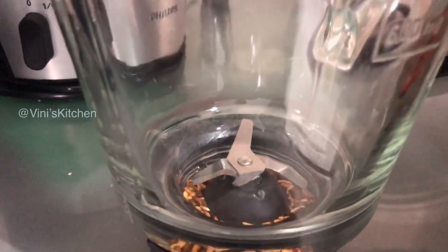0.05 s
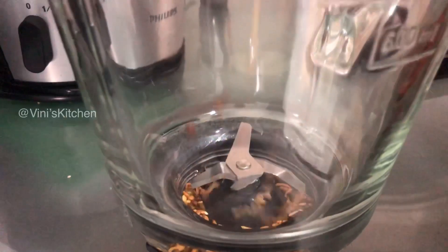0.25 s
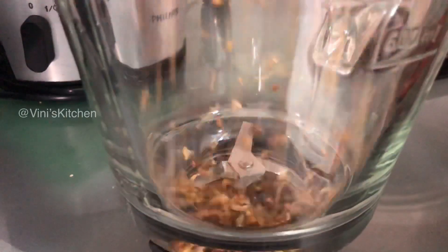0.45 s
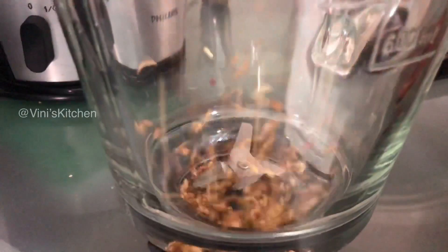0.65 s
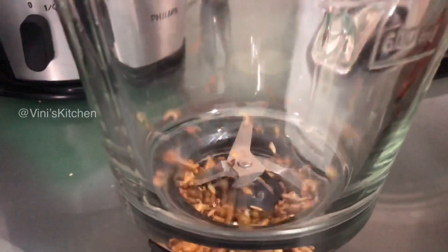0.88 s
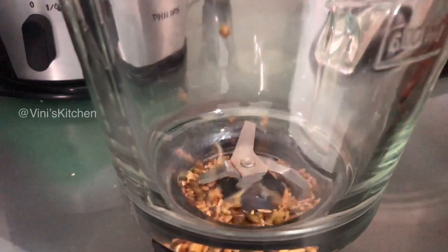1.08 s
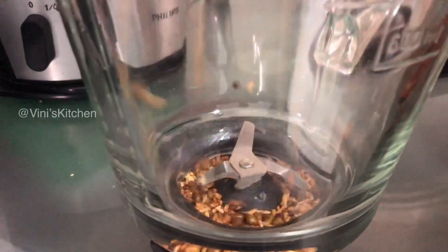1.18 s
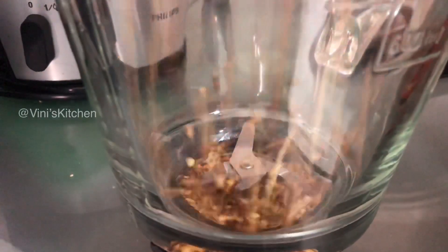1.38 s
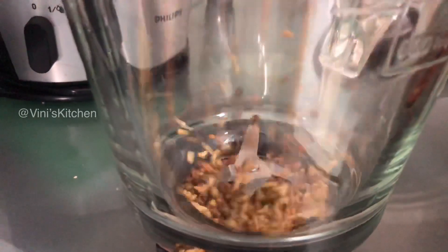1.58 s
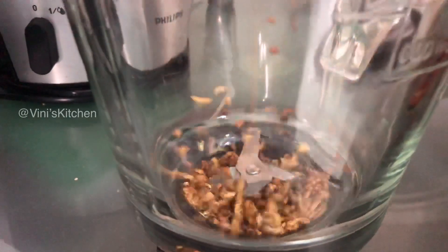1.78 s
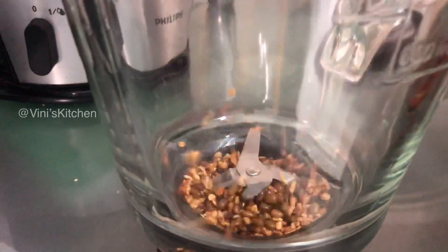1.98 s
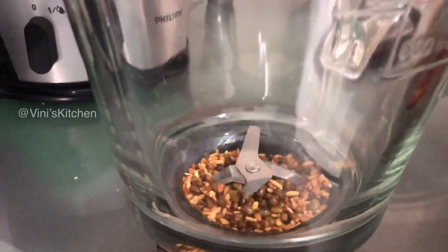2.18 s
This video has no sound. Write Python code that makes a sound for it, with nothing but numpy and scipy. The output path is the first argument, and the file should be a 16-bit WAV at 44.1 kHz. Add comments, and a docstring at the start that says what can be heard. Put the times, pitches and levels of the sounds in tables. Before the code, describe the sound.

Dry grains rattle into a glass blender jar, close up. A soft sliding rustle and a few clicks lead to a dense pour at about 0.3 seconds, with a brief high ring of glass. It thins by 0.9, the rustle returns, and a second batch clatters in from 1.3. Single knocks and seed pings stand out, dwindling by 2.2 seconds over faint kitchen hum.

```python
"""A small kitchen, one microphone close to a glass blender jar on the counter.
Dry grains are poured in two batches, each led in by the soft rustle of sliding grains.
A dense stream rattles on the glass and the heap, heavier pieces knock singly, hard seeds ping,
and once the glass gives a longer high ring. Each contact clicks; those on bare glass ring the jar.
Further off: dull room noise and low hums."""
import sys
import numpy as np
from scipy import signal
from scipy.fft import rfft, irfft, next_fast_len
from scipy.io import wavfile
from scipy.ndimage import map_coordinates

SR = 44100
rng = np.random.default_rng(int(sys.argv[2]) if len(sys.argv) > 2 else 0)


def file_out(sig):
    """Save sig as 16-bit WAV at sys.argv[1]."""
    # one column per channel
    cols = np.atleast_2d(sig).T
    # limit, then scale
    lim = np.clip(cols, -1, 1)
    pcm = np.round(lim * 32767).astype(np.int16)
    wavfile.write(sys.argv[1], SR, pcm)


N = 99225

# colour of the room noise: pitch_hz, gain_db
AIR_COLOUR = [(20, -50), (33, -27), (48, -11.5), (80, -12), (135, -6.5), (200, -13.5), (320, -7.5),
              (460, -15), (600, -9.5), (900, -25), (2000, -35.5), (6000, -39)]
# low hums in the room: pitch_hz, level_db, start_s, end_s
ROOM_HUMS = [(48.6, -56.5, -.2, 1.27), (101, -60, .25, 1.5), (307, -64, -.2, 2.5), (64.6, -51, 1.87, 2.5)]
# grains sliding in the vessel above the jar: start_s, end_s, level_db
GRAIN_SLIDES = [(-.1, .3, -49), (0.96, 1.332, -45)]
# colour of the sliding: pitch_hz, gain_db
RUSTLE_COLOUR = [(300, -11), (800, -0.5), (1400, -1.5), (2300, -2), (4500, 3), (8000, -1), (12000, -6),
                 (16000, -21)]
# the stream's relative level in three bands: time_s, low_db, clatter_db, treble_db
STREAM_LEVELS = [(0.0, -73, -64.5, -62), (0.14, -70, -48, -57), (0.188, -58, -38.5, -43.4),
                 (0.285, -73, -38.8, -44.5), (0.342, -32, -32, -32), (0.409, -32.5, -26, -31.5),
                 (0.492, -35.5, -30, -31.5), (0.58, -33, -30, -35.5), (0.66, -33.5, -31, -32),
                 (0.75, -41, -33, -36.9), (0.83, -42.1, -36.5, -37.5), (0.9, -40, -38.5, -43.5),
                 (0.98, -44.5, -40.5, -43), (1.07, -46.5, -37, -40.5), (1.13, -52, -40, -46.5),
                 (1.23, -52, -40, -46.5), (1.291, -52, -35, -36), (1.349, -32.5, -26, -31.5),
                 (1.439, -36.5, -30, -32.5), (1.57, -34, -29, -31.5), (1.633, -46.4, -36, -38.5),
                 (1.692, -38.5, -33.5, -33.5), (1.78, -38.5, -33, -36.5), (1.83, -47.5, -39, -44.5),
                 (1.95, -46, -40, -41.5), (1.99, -52, -44.5, -49), (2.11, -45, -44.5, -49),
                 (2.17, -81, -59, -64.3), (2.25, -80, -57, -65)]
# colour of a click inside the jar: pitch_hz, gain_db
CLICK_COLOUR = [(100, -29), (400, -21.5), (750, -8), (1100, -3.5), (1450, -10), (1680, -20.5),
                (2200, -26.5), (2800, -19.5), (3300, -9.5), (4100, -12), (4550, -6.5), (5150, -3),
                (5800, -8), (6300, -2), (6950, 0.5), (7700, -10.5), (8400, -15.5), (9600, -6), (11100, -10),
                (11900, -8), (13000, -9), (13700, -18), (16000, -10)]
# modes of the glass jar: pitch_hz, relative_energy_db, t60_s
JAR_MODES = [(832, -18.5, .11), (1378, -11, .17), (2314, -31, .2), (3000, -17, .25), (3168, -17, .09),
             (4420, -23, .04), (6350, -19, .08), (6500, -20, .06), (6718, -6, .17), (6880, -17, .06),
             (8904, -15, .12), (9350, -18, .03), (10540, -19, .04), (11812, -15, .06), (12340, -15.5, .13),
             (12510, -20, .07), (12708, -19, .08), (13285, -17, .06), (15720, -20, .14)]
# heavier pieces and their relative levels: start_s, low_db, clatter_db, treble_db
PIECE_KNOCKS = [(0.0434, -61, -37, -42), (0.0854, -56, -41.5, -50), (0.154, -71, -37.5, -48),
                (0.174, -45, -49, -45), (0.184, -64, -31, -40), (0.203, -35, -35, -43),
                (0.207, -36, -31, -37), (0.2189, -35, -28, -38), (0.2371, -39.5, -34, -35),
                (0.2569, -51, -37, -39), (0.277, -58, -59, -44), (0.291, -38.5, -41, -41),
                (0.3026, -26.5, -23, -36), (0.3363, -34, -26, -37), (0.361, -33.5, -29, -37),
                (0.3957, -28, -26, -32), (0.428, -42, -26, -30), (0.521, -41, -27.5, -28.5),
                (0.559, -27.5, -23, -32), (0.564, -43, -34, -34), (0.59, -30, -45, -35),
                (0.602, -48, -52, -28), (0.6223, -33, -21, -26), (0.641, -27.5, -37, -47),
                (0.728, -32, -25, -32), (0.745, -65, -27, -40), (0.763, -32, -63, -49),
                (0.8051, -27, -30, -41), (0.852, -48, -28, -37), (0.862, -26, -28, -31),
                (0.9277, -32.5, -28.5, -62), (0.944, -69, -40, -56), (0.9931, -41, -37, -50),
                (1.012, -38.5, -33, -41), (1.1315, -41, -35, -54), (1.187, -32, -40, -49),
                (1.2434, -63, -35, -36.5), (1.3004, -44, -29.5, -35), (1.3209, -38, -31, -36),
                (1.3369, -59, -28, -28), (1.363, -25.5, -42, -31), (1.3868, -26, -22, -39),
                (1.391, -36, -20, -28), (1.413, -28, -46, -26.5), (1.459, -30.5, -28, -31),
                (1.5, -39, -32, -34), (1.543, -56, -27.5, -31), (1.57, -60, -25.5, -26.5),
                (1.584, -59, -27, -45), (1.604, -35.5, -40, -37), (1.653, -44, -22, -28),
                (1.6622, -25, -28, -33), (1.682, -38, -22.5, -30), (1.698, -62, -28, -49),
                (1.722, -60, -28.5, -32), (1.7832, -66, -23.5, -31), (1.7958, -38, -46, -27.5),
                (1.851, -33, -39, -44), (1.8619, -33, -32, -35.5), (1.878, -45, -32, -40),
                (1.8919, -47, -27.5, -33), (1.927, -56, -32, -37), (1.948, -37.5, -34, -51),
                (1.959, -40.5, -39, -64), (2.0377, -44, -34.5, -43), (2.196, -78, -51, -54),
                (2.2288, -79, -65, -51)]
# short pings of hard seeds, and one longer high ring of the glass jar: start_s, pitch_hz, level_db, t60_s
SEED_AND_GLASS_PINGS = [(0.2204, 6870, -14, 0.015), (.257, 4420, -28, .03), (0.3052, 6780, -17.5, 0.033),
                        (.306, 12360, -26, 0.12), (.5615, 5050, -14.5, 0.011), (0.707, 5030, -23, 0.023),
                        (.7275, 5100, -21, .012), (0.7464, 6100, -20, .012), (0.775, 4450, -36, .015),
                        (0.9256, 6370, -22.5, 0.014), (.992, 4680, -27, .008), (1.2435, 4530, -27, 0.017),
                        (1.4254, 4800, -13.5, 0.0048), (1.4612, 4600, -13, .007),
                        (1.4784, 5000, -21, 0.0082), (1.5, 5160, -17, .007), (1.5847, 4700, -17.5, 0.0077),
                        (1.663, 6200, -13, 0.0086), (1.6985, 5230, -12.5, 0.0056),
                        (1.7022, 4600, -13, .006), (1.8153, 4930, -17.5, 0.006), (1.9574, 6200, -24, .012),
                        (2.195, 5100, -39, .007)]

SPLIT_HZ = (2200, 8000)  # edges between the low, clatter and treble bands
STREAM_GAIN_DB, PIECE_GAIN_DB = (-3, 2.5, 3), (23, 23, 28)  # per band
GRAINS_PER_S, SIZE_SCATTER_DB = 1500, 4.5  # rate at full flow; spread of grain sizes
THINNING, RING_FADE = .35, .5  # fall of grain rate and of share on bare glass, dB per dB of flow
BOUNCE_S, BOUNCE_DB, HEAP_DB_PER_S = .0013, -9, .5
PING_ECHO_S, PING_ECHO_DB = .0055, -5.5
TIME_S, RING_S = np.arange(N) / SR, np.arange(SR // 4) / SR


def amp(db):
    return 10 ** (np.asarray(db) / 20)


def unit_rms(x):
    return x / np.sqrt(np.mean(x ** 2) + 1e-20)


def colour(points, size):
    """Gains of (Hz, dB) points on an FFT grid."""
    hz, db = np.transpose(points)
    return amp(np.interp(np.log(np.fft.rfftfreq(size, 1 / SR) + 1), np.log(hz), db))


def coloured(noise, points):
    """Noise shaped to this colour, at unit RMS."""
    return unit_rms(irfft(rfft(noise) * colour(points, N), N))


def impulse_response(points, size=1024):
    """The shortest impulse response with this colour (minimum phase)."""
    cepstrum = irfft(np.log(colour(points, size)))
    cepstrum[1:size // 2] *= 2
    cepstrum[size // 2 + 1:] = 0
    return irfft(np.exp(rfft(cepstrum)))


def decay(t60_s):
    """A fall of 60 dB in t60_s."""
    return np.exp(-np.log(1000) * RING_S / t60_s)


def gate(start_s, end_s, fade_s):
    """Linear fades centred on start and end."""
    return np.clip(np.minimum(TIME_S - start_s, end_s - TIME_S) / fade_s + .5, 0, 1)


def wobble(knots_per_s):
    """A smooth random curve in time."""
    return map_coordinates(rng.standard_normal(256), [TIME_S * knots_per_s], mode="wrap")


def ripples(width_hz, count):
    """Smooth random curves along frequency, one knot every width_hz."""
    position = np.fft.rfftfreq(len(RING_S), 1 / SR) / width_hz
    knots = rng.standard_normal((count, 512))
    return np.array([map_coordinates(row, [position], mode="wrap") for row in knots])


def room_tone(air_db=-48, waver_db=1.5):
    """Behind the jar: dull room noise and low wavering hums that come and go."""
    out = amp(air_db) * coloured(rng.standard_normal(N), AIR_COLOUR)
    for hz, db, start_s, end_s in ROOM_HUMS:
        level = amp(db + waver_db * wobble(6.97)) * gate(start_s, end_s, fade_s=.3)
        out += np.sqrt(2) * level * np.sin(2 * np.pi * hz * TIME_S + .13 * wobble(5.5))
    return out


def sliding_grains(rough_db=1.8):
    """Above the jar, grains creep towards the vessel's rim: a soft dry rustle with no ring of glass."""
    level = sum(amp(db) * gate(start_s, end_s, fade_s=.1) for start_s, end_s, db in GRAIN_SLIDES)
    scrape = rng.standard_normal(N) * amp(rough_db * wobble(100.3))
    return level * coloured(scrape, RUSTLE_COLOUR)


def contact_clicks(count, t60_s, echo_db, grain_tint_db=3, jar_tint_db=3):
    """Each contact is a burst of noise with an echo in the jar, at unit energy."""
    size = len(RING_S)
    bursts = rng.standard_normal((count, size)) * (decay(t60_s) + amp(echo_db) * decay(.085))
    tint_db = grain_tint_db * ripples(width_hz=787, count=count)  # each grain favours other pitches
    tint_db += jar_tint_db * ripples(width_hz=90, count=1)  # the jar's fine peaks, common to all
    clicks = signal.fftconvolve(bursts, impulse_response(CLICK_COLOUR)[None], axes=1)[:, :size]
    clicks = irfft(rfft(clicks) * amp(tint_db), size) * (RING_S < RING_S[-1] / 2)
    return clicks / np.linalg.norm(clicks, axis=1, keepdims=True)


def glass_rings(count, band_db, scatter_db=1.3):
    """The jar rings in decaying modes; each spot struck gives them other strengths and signs."""
    hz, db, t60_s = np.transpose(JAR_MODES)
    modes = np.sin(2 * np.pi * hz[:, None] * RING_S) * decay(t60_s[:, None])
    modes /= np.linalg.norm(modes, axis=1, keepdims=True)
    db = db + np.array(band_db)[np.searchsorted(SPLIT_HZ, hz)]
    db = db + scatter_db * rng.standard_normal((count, len(hz)))
    return (rng.choice([-1, 1], db.shape) * amp(db)) @ modes


def jar_contacts(count, click_t60_s, echo_db, ring_db):
    """Clicks and rings for count spots, in three bands; click plus ring has unit energy in each."""
    parts = [contact_clicks(count, click_t60_s, echo_db), glass_rings(count, ring_db)]
    splits = [(SPLIT_HZ[0], "low"), (SPLIT_HZ, "band"), (SPLIT_HZ[1], "high")]
    filters = [signal.butter(7, edge_hz, kind, fs=SR, output="sos") for edge_hz, kind in splits]
    bands = np.stack([signal.sosfilt(sos, parts) for sos in filters], axis=2)
    return bands / np.linalg.norm(bands.sum(0), axis=2, keepdims=True)


def grain_stream(spots=24):
    """Small grains land at random; more flow is louder, denser and rings the glass more often."""
    time_s, *bands = np.transpose(STREAM_LEVELS)
    level_db = np.array([np.interp(TIME_S, time_s, band) for band in bands])
    flow_db = level_db[1] - level_db[1].max()  # the clatter band stands for the flow
    chance = GRAINS_PER_S / SR * amp(THINNING * flow_db)
    sizes = unit_rms(amp(SIZE_SCATTER_DB * np.clip(rng.standard_normal(N), -2, 2)))
    kicks = sizes * rng.choice([-1, 1], N) / np.sqrt(chance)  # same power at any grain rate
    force = kicks * amp(level_db + np.array(STREAM_GAIN_DB)[:, None])
    spot = rng.integers(spots, size=N)
    on_glass = rng.random(N) < amp(RING_FADE * flow_db)
    clicks, rings = jar_contacts(spots, click_t60_s=.021, echo_db=-4.5, ring_db=(-1, 3, 1.5))
    ringing = clicks + rings
    out = np.zeros(N + SR)
    for i in np.flatnonzero(rng.random(N) < chance):
        out[i:i + len(RING_S)] += force[:, i] @ (ringing if on_glass[i] else clicks)[spot[i]]
    return out[:N]


def heavy_pieces():
    """Heavier pieces knock on the glass, tip over and touch again; the growing heap muffles the ring."""
    out = np.zeros(N + SR)
    clicks, rings = jar_contacts(len(PIECE_KNOCKS), click_t60_s=.011, echo_db=-9, ring_db=(2, -1, -.5))
    for (start_s, *band_db), click, ring, bounce in zip(PIECE_KNOCKS, clicks, rings, clicks[::-1]):
        gains = amp(np.array(band_db) + PIECE_GAIN_DB)
        heap_gain = amp(-HEAP_DB_PER_S * (start_s - 1.5))
        out[round(start_s * SR):][:len(RING_S)] += gains @ (click + heap_gain * ring)
        bounce_s = start_s + BOUNCE_S * (.5 + rng.random())
        out[round(bounce_s * SR):][:len(RING_S)] += amp(BOUNCE_DB) * gains @ bounce
    return out[:N]


def seed_and_glass_pings():
    """Hard seeds ping briefly and the glass gives one longer high ring; the wall sends each back once."""
    out = np.zeros(N + SR)
    for start_s, hz, db, t60_s in SEED_AND_GLASS_PINGS:
        envelope = decay(t60_s) * (1 - decay(.0012))
        ping = amp(db) * envelope * np.sin(2 * np.pi * hz * RING_S)
        out[round(start_s * SR):][:len(ping)] += ping
        echo_s = start_s + PING_ECHO_S * (.5 + rng.random())
        out[round(echo_s * SR):][:len(ping)] += amp(PING_ECHO_DB) * ping
    return out[:N]


def kitchen_reverb(direct, t60_s=.18, level_db=-18.5):
    """The small room's short answer, faint this close to the jar."""
    tail = rng.standard_normal(len(RING_S)) * decay(t60_s) * (1 - decay(.033))
    return amp(level_db) * signal.fftconvolve(direct, tail / np.linalg.norm(tail))[:N]


def scene():
    """At the microphone, in mono: the pour up close, the kitchen behind it."""
    jar = grain_stream() + heavy_pieces() + seed_and_glass_pings()
    return (jar + kitchen_reverb(jar) + sliding_grains() + room_tone())[None]


def record(dry):
    """The microphone chain passes nothing above its band limit."""
    top_hz = 15850
    size = next_fast_len(N + SR // 2)
    passband = np.fft.rfftfreq(size, 1 / SR) < top_hz
    return irfft(rfft(dry, size) * passband, size)[:, :N]


dry = scene()
out = record(dry)
file_out(out)
```